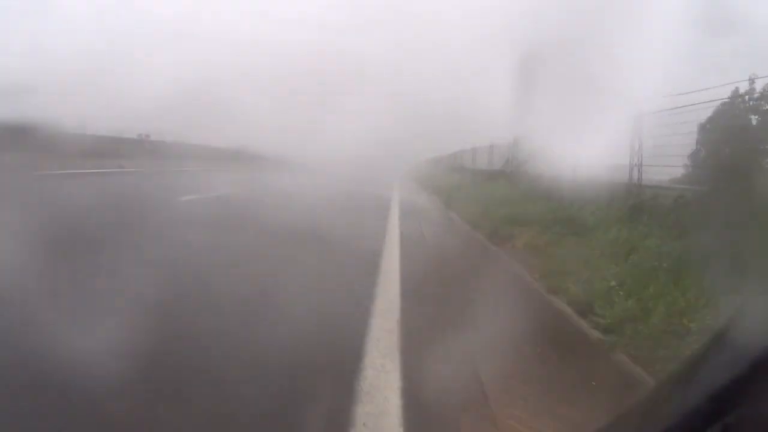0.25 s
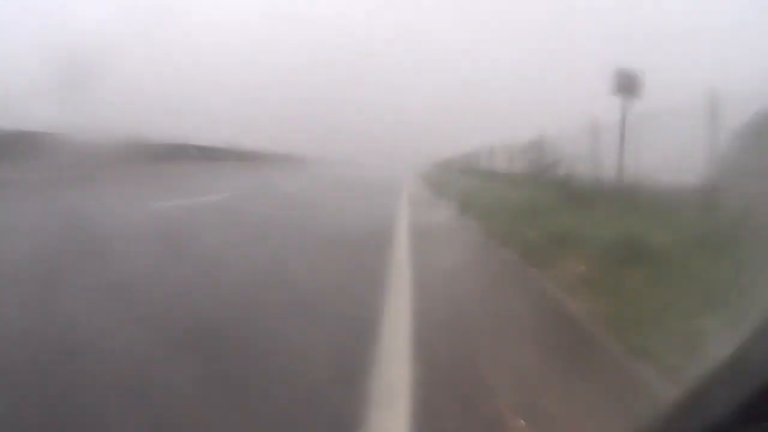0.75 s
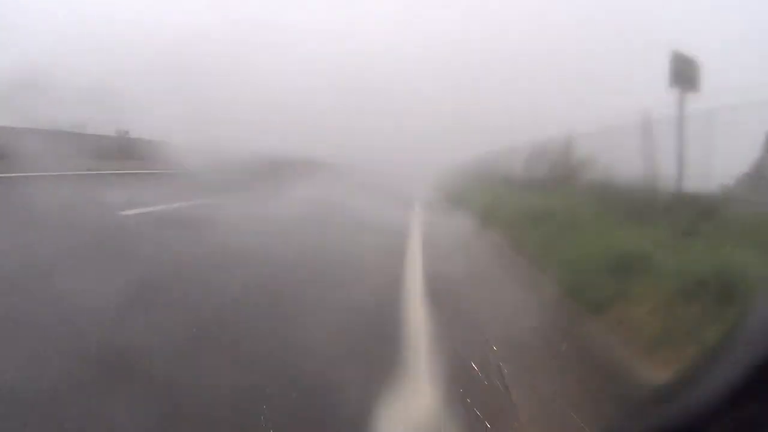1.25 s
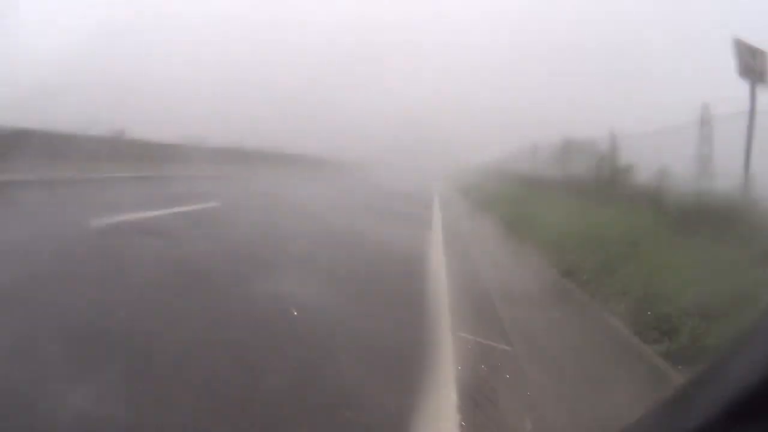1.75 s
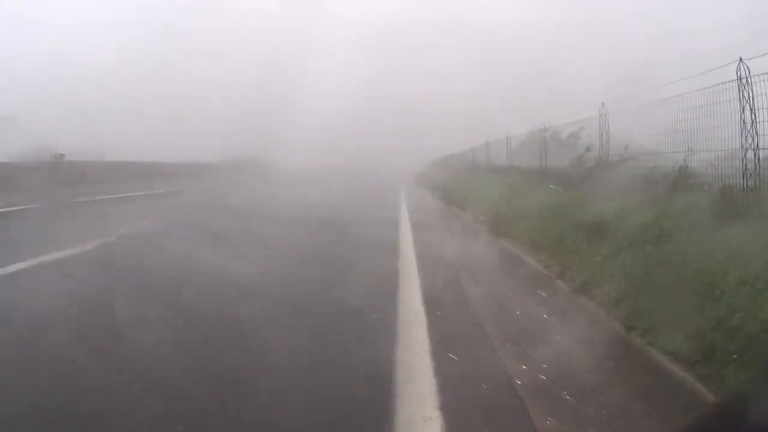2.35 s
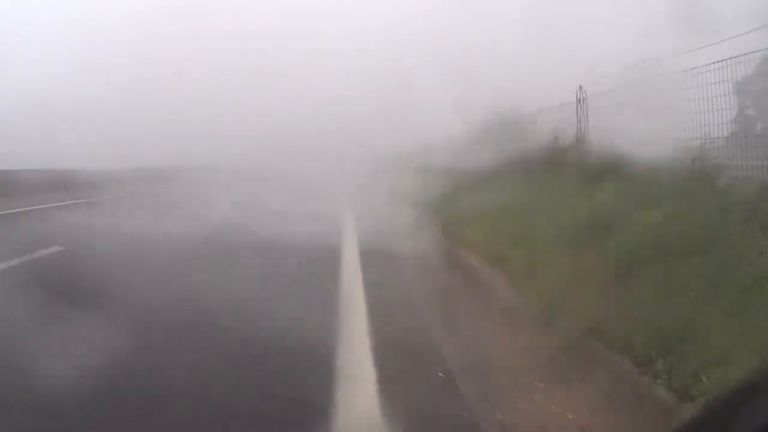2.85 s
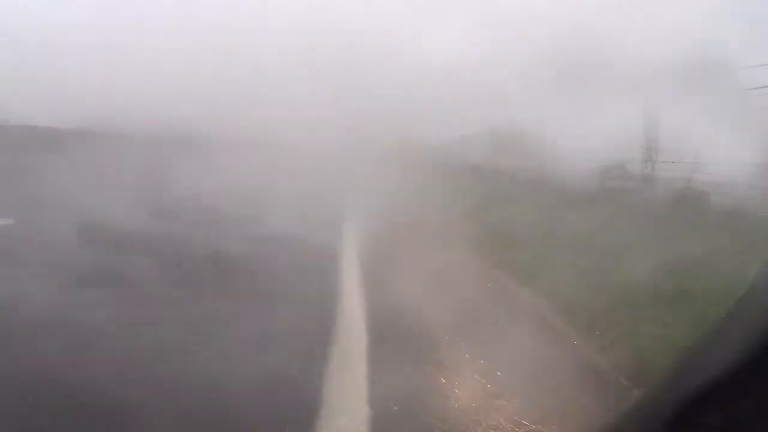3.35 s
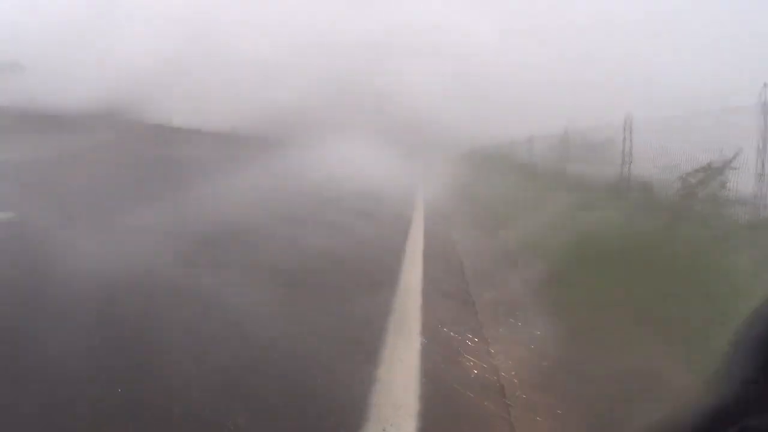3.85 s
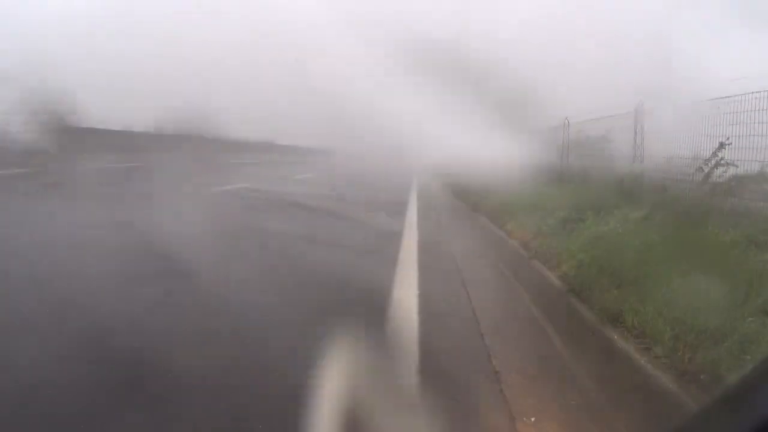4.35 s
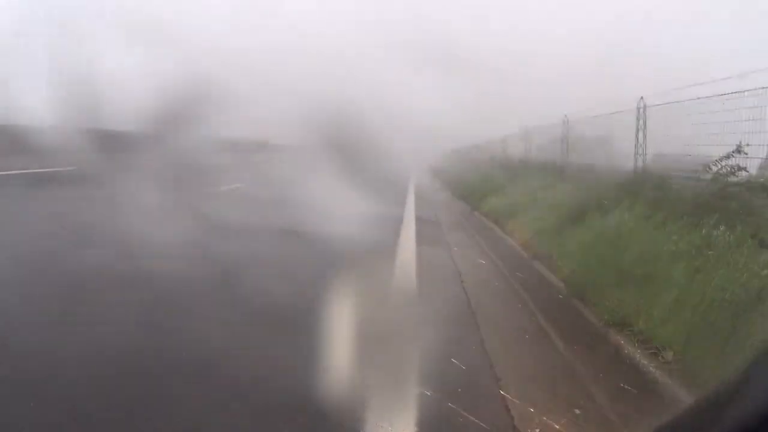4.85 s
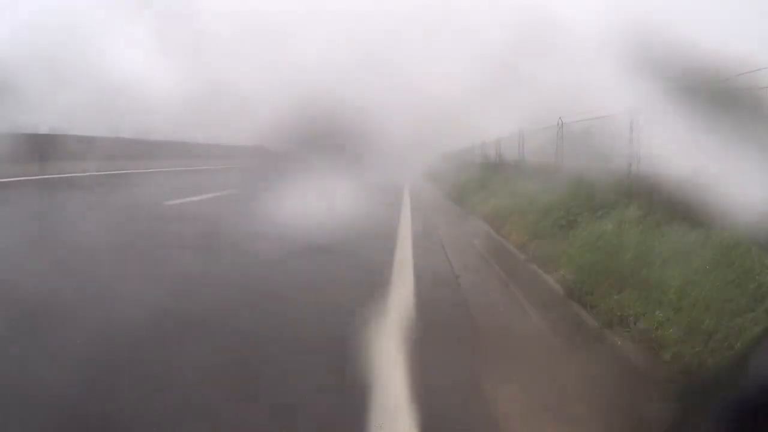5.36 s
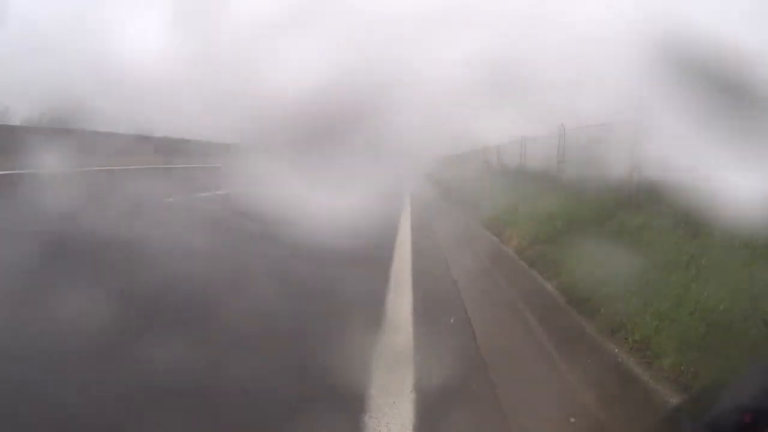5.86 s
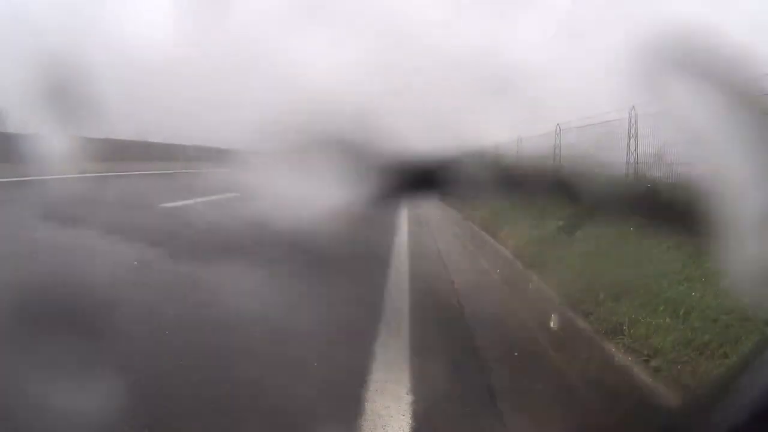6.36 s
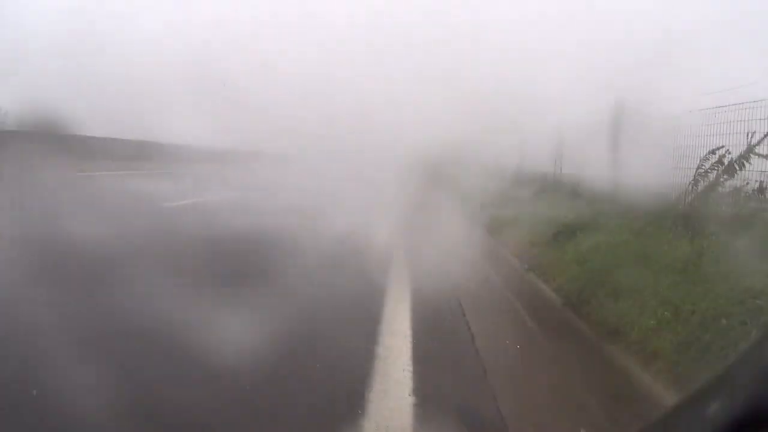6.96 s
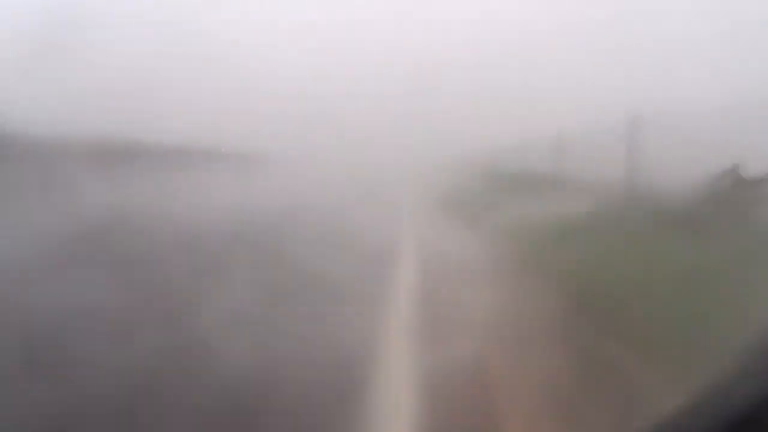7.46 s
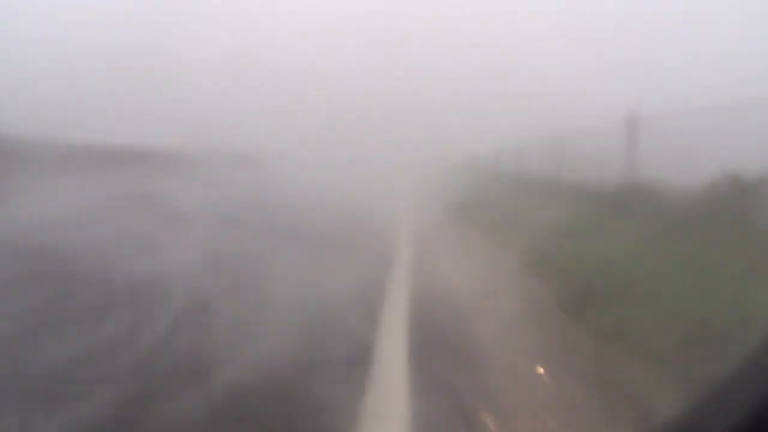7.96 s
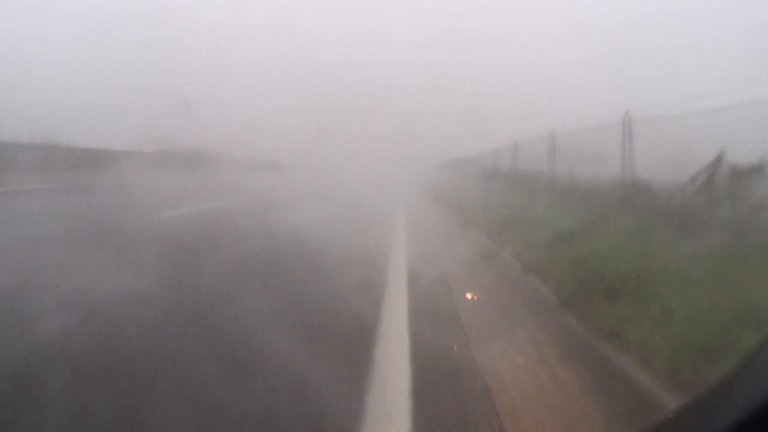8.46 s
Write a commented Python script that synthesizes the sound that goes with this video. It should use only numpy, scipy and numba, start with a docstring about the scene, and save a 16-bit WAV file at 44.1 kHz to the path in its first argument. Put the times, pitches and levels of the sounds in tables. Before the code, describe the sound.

Dense raindrops tick and sizzle against the microphone housing as a motorcycle rides fast, wind buffeting over its steady engine drone.

```python
"""On a motorcycle at highway speed in heavy rain, heard from a camera in a plastic case.
Drops strike the case and ring its modes, singly or in dense sheets of spray; water slugs plop on the
two microphone ports. Wind buffets the case; the engine booms through the mount; a low drone rises twice.
The camera's limiter flattens the hardest drops and briefly ducks everything else after each."""
import sys
import numpy as np
from scipy import signal
from scipy.fft import rfft, irfft, next_fast_len
from scipy.io import wavfile
from scipy.ndimage import uniform_filter1d, minimum_filter1d
from numba import njit

SR = 44100
rng = np.random.default_rng(int(sys.argv[2]) if len(sys.argv) > 2 else 0)


def store_wav(level_fs):
    """Save 16-bit WAV to argv[1]."""
    pcm = np.round(np.clip(np.atleast_2d(level_fs), -1, 1) * 32767)
    wavfile.write(sys.argv[1], SR, pcm.T.astype(np.int16))


N = 383669
RING_SAMPLES, ATTACK_SAMPLES = 1024, 160

# low drone: (time [s], pitch [Hz], level [dB])
DRONE_TRACK = [(1.8, 76, -78), (1.93, 80, -55), (2.06, 89, -46), (2.2, 86, -49), (2.35, 78, -68),
               (3.15, 60, -78), (3.4, 62, -64), (3.75, 67, -62), (4.2, 64, -62), (4.45, 63, -80)]
# engine speed: (time [s], firing rate [Hz])
FIRING_RATE = [(0, 49.71), (3.5, 51.03), (4, 52.9), (5.5, 53.66), (6.2, 52.48), (6.7, 54.1), (8.7, 50.43)]
# wind inside the case: (frequency [Hz], relative density [dB])
WIND_SPECTRUM = [(20, -24), (60, -18), (100, -13.5), (160, -0.5), (200, -0.5), (255, 3.5), (315, -3),
                 (370, -15.5), (650, -18.5), (800, -8), (1300, -20), (3300, -32), (5500, -37.5),
                 (11000, -58)]
# airflow under the gusts: (time [s], level [dB])
AIRFLOW_FLOOR = [(0, -39), (.75, -46), (1.602, -41), (2.25, -41), (2.45, -46.5), (3.3, -43.5), (4.4, -42),
                 (4.92, -49), (5.3, -41), (7.3, -38.5), (8.101, -46.5), (8.7, -39)]
# gusts on the case: (start [s], length [s], level [dB])
WIND_GUSTS = [(.03, 0.077, -37), (.2, 0.056, -36.5), (.34, 0.25, -36.5), (.94, 0.13, -39),
              (1.15, 0.092, -35), (1.35, 0.13, -39), (3.33, .28, -35.5), (3.68, .06, -41),
              (3.91, .31, -36.5), (4.53, .11, -37.5), (5.35, .17, -34.5), (5.63, 0.51, -36),
              (6.34, 0.19, -35), (6.5, 0.36, -32.5), (7.05, 0.068, -30), (7.87, 0.13, -36.5),
              (8.49, 0.14, -35)]
# case modes: (frequency [Hz], width [Hz], relative level [dB], left minus right [dB], left lead [rad])
CASE_MODES = [(782, 60, -18.5, -11, -0.2), (1002, 620, -18, 11, -0.75), (1276, 230, 1, 1, 0),
              (1355, 607, .5, -3.5, 0.17), (1819, 507, 4, 0, 0.23), (2660, 1330, -7, -2, 0.2),
              (2914, 855, -1.5, 2.5, 0.06), (3313, 1410, -9, 10.5, -0.7), (3490, 900, -3.5, 2, 2),
              (3950, 1420, -9.5, -1, 2.5), (4990, 1400, -17.5, -4.5, 0.5), (6670, 1830, -24.5, -3, -1),
              (7750, 2000, -22.5, 1, -1.3), (10400, 300, -34.5, -2, -1)]
# water slugs on a port: (time [s], pitch [Hz], relative level [dB], width [Hz], right lead [rad])
WATER_SLUGS = [(.219, 872, -15.5, 250, 0.3), (1.441, 916, -7.5, 259.6, 1.2), (2.246, 1333, -14, 111.1, 0),
               (2.436, 650, -11, 704, 3), (3.812, 600, -21, 594.5, 2.5), (4.430, 484, -12, 601.5, 0.8),
               (4.997, 482, -9, 601, -1.6), (5.001, 624, -11, 800, 7), (5.083, 660, -6, 700, 2.2),
               (5.875, 880, -21.5, 300, 4), (6.363, 880, -2, 650, 1.6), (6.367, 1230, -0.5, 330, 0),
               (6.373, 1170, -9, 169.4, -1)]
# thin spray between sheets: (time [s], relative level [dB])
SPRAY_FLOOR = [(0, -31), (1.55, -30), (2.38, -34), (2.75, -29), (3.35, -30), (4.3, -29), (5.8, -33),
               (6.05, -31), (6.33, -39), (6.5, -30), (8.7, -30)]
# sheets of spray: (start [s], length [s], relative level [dB])
SPRAY_SHEETS = [(0, .03, -19), (0.076, .04, -26), (.26, .075, -23), (0.599, .25, -17), (.85, .08, -22),
                (1.004, .045, -20.5), (1.256, .04, -22), (1.376, .12, -20.5), (1.602, .19, -20),
                (1.84, .09, -20.5), (1.989, .16, -21.5), (2.211, .12, -28), (2.45, .24, -20),
                (2.76, .37, -22.5), (3.141, .14, -21), (3.37, 0.094, -28), (3.52, .26, -21),
                (3.828, .15, -21), (4.041, .17, -21.5), (4.36, .07, -19.5), (4.53, .09, -21),
                (4.691, .31, -21), (5, .04, -27), (5.168, 0.12, -25), (5.402, .11, -28), (5.58, .14, -27),
                (6.07, .1, -18.5), (6.17, .08, -25), (6.66, .05, -23.5), (6.86, .16, -20),
                (7.129, .17, -20.5), (7.3, 1.133, -18.5), (8.479, .22, -20.5)]
# spray fineness: (time [s], relative treble [dB])
SPRAY_FINENESS = [(0, -18), (.35, -9), (.6, -11), (1.05, -10), (1.4, -12.5), (2.2, -6.5), (2.75, -8.5),
                  (3.45, -6), (4.05, -10), (4.4, -6.5), (4.9, -5.5), (5.8, -13.5), (6.2, -14.5),
                  (6.35, -22), (6.8, -15), (7.25, -4.5), (7.65, -13), (8.3, -12), (8.7, 0)]
# heavy single drops: (time [s], relative level [dB], nominal ring centre [Hz])
HEAVY_DROPS = [(0.043, -15, 1870), (0.149, -15, 2220), (0.196, -15, 1690), (0.332, -14, 1770),
               (0.357, -17, 2330), (0.429, -14, 2570), (0.436, -14, 1750), (0.462, -16, 2450),
               (0.487, -18, 1940), (0.511, -15, 1740), (0.519, -16, 1610), (0.573, -15, 2920),
               (0.602, -13, 2160), (0.964, -15, 1870), (0.982, -15, 2370), (1.047, -16, 2880),
               (1.066, -15, 2240), (1.088, -15, 1610), (1.134, -17, 1780), (1.23, -14, 2040),
               (1.254, -15, 2580), (1.277, -14, 1930), (1.31, -16, 1920), (1.336, -15, 2400),
               (1.578, -15, 2470), (1.83, -16, 2040), (1.963, -16, 2540), (2.178, -15, 2600),
               (2.223, -16, 2670), (2.25, -15, 1350), (2.265, -15, 2610), (2.29, -18, 2650),
               (2.331, -14, 2370), (2.354, -16, 2410), (2.38, -13, 2230), (2.389, -16, 2430),
               (2.402, -14, 2050), (2.436, -12, 2220), (2.748, -15, 2570), (2.904, -14, 2370),
               (3.813, -16, 2480), (4.006, -15, 1790), (4.254, -15, 2850), (4.299, -16, 2550),
               (4.511, -17, 1890), (4.638, -15, 2840), (5.001, -12, 2080), (5.017, -15, 2860),
               (5.083, -13, 2450), (5.16, -17, 2440), (5.198, -15, 2770), (5.281, -16, 2850),
               (5.391, -17, 2000), (5.523, -14, 2690), (5.551, -21, 1800), (5.577, -16, 2330),
               (5.622, -16, 1980), (5.734, -16, 1660), (5.744, -15, 1780), (5.876, -18, 1430),
               (5.98, -16, 1850), (6.026, -16, 1800), (6.276, -17, 2050), (6.308, -15, 2050),
               (6.368, -11, 1330), (6.383, -14, 1920), (6.429, -15, 2100), (6.477, -17, 2130),
               (6.501, -19, 1750), (6.678, -13, 1770), (6.755, -17, 2880), (6.815, -14, 1720),
               (6.837, -16, 2470), (6.989, -11, 1570)]


def undb(db):
    """Decibels to gain."""
    return 10 ** (np.asarray(db) / 20)


def unit(x):
    """Scale to rms 1."""
    return x / np.sqrt(np.mean(x ** 2))


def left_right(difference):
    """Split a difference evenly over the two ports."""
    return np.array([[.5], [-.5]]) * difference


def curves(table):
    """Table columns, linearly interpolated over time."""
    times_s, *columns = np.transpose(table)
    return [np.interp(np.arange(N) / SR, times_s, column) for column in columns]


def walk(rate_hz):
    """Random steps, smoothed twice; spread near 1."""
    hold = int(SR / rate_hz)
    steps = np.repeat(rng.standard_normal(N // hold + 1), hold)
    return 1.3 * uniform_filter1d(uniform_filter1d(steps, hold), hold)[:N]


def noise(spectrum):
    """Noise of rms 1, shaped by (frequency [Hz], level [dB]) points."""
    hz, db = np.transpose(spectrum)
    size = next_fast_len(N)
    bins_hz = np.arange(size // 2 + 1) * SR / size
    gain = undb(np.interp(np.log(bins_hz + 1), np.log(hz), db))
    return unit(irfft(rfft(rng.standard_normal(size)) * gain, size)[:N])


def swells_db(bursts, floor, attack_s, release_s):
    """Level of bursts that rise, hold and decay over a floor curve."""
    t = np.arange(N) / SR
    gain = undb(curves(floor)[0])
    for start_s, length_s, db in bursts:
        onset = np.clip((t - start_s) / attack_s + .5, 0, 1)
        fade = np.exp(-np.clip((t - start_s - length_s) / release_s, 0, 20))
        gain = np.maximum(gain, undb(db) * onset * fade)
    return 20 * np.log10(gain)


@njit
def peak_envelope(peaks, decay):
    """Instant attack, exponential release."""
    out, held = np.empty(len(peaks)), 0.
    for i in range(len(peaks)):
        held = max(peaks[i], held * decay)
        out[i] = held
    return out


def drone(octave_db=-9, waver_db=2.5, waver_hz=27.5):
    """A low, wavering tone rises out of the rumble and sinks back."""
    hz, db = curves(DRONE_TRACK)
    phase = 2 * np.pi * np.cumsum(hz) / SR
    tone = np.sin(phase) + undb(octave_db) * np.sin(2 * phase)
    return tone * undb(db + waver_db * walk(waver_hz))


def engine(gust_db, gain_db=-7, body_hz=240, width_hz=170, scatter_db=3, wobble=.012):
    """Uneven firings boom through the mount into the case; level tracks the wind."""
    firing_hz = curves(FIRING_RATE)[0] * (1 + wobble * walk(25))
    cycles = np.cumsum(firing_hz) / SR
    firings = np.diff(np.floor(cycles), prepend=0) * undb(scatter_db * rng.standard_normal(N))
    b, a = signal.iirpeak(body_hz, body_hz / width_hz, fs=SR)
    boom = signal.lfilter(b, a, signal.lfilter(b, a, firings))
    return unit(boom) * undb(gust_db + gain_db)


def wind(gust_db, flutter_db=2.5, flutter_hz=70, side_db=-15):
    """Turbulence shakes the whole case: nearly the same rush at both ports."""
    mid = noise(WIND_SPECTRUM)
    side = undb(side_db) * noise(WIND_SPECTRUM)
    return np.array([mid + side, mid - side]) * undb(gust_db + flutter_db * walk(flutter_hz))


def ring_at_ports(hz, width_hz, left_lead_rad):
    """A resonance swells and dies, phase-shifted between ports: ports x samples."""
    t = np.arange(RING_SAMPLES) / SR
    age = np.pi * width_hz * t
    return age * np.exp(1 - age) * np.sin(2 * np.pi * hz * t + left_right(left_lead_rad))


def slugs(gain_db=-4, right_bias_db=3):
    """Each water slug traps an air pocket: a hollow plop."""
    out = np.zeros((2, N))
    for time_s, hz, db, width_hz, right_lead_rad in WATER_SLUGS:
        start = int(time_s * SR)
        plop = ring_at_ports(hz, width_hz, -right_lead_rad)
        out[:, start:start + RING_SAMPLES] += undb(db + gain_db) * plop
    return out * undb(left_right(-right_bias_db))


def case_rings():
    """Impulse responses of the case: modes x ports x samples."""
    return np.array([width_hz / SR * undb(db + left_right(pan_db)) * ring_at_ports(hz, width_hz, lead_rad)
                     for hz, width_hz, db, pan_db, lead_rad in CASE_MODES])


def strike(tilt_db_per_oct, treble_db_per_oct, place_db, port_scatter):
    """Drive of each impact on the case: drops x modes x ports."""
    hz = np.array(CASE_MODES)[:, 0]
    octaves = np.clip(np.log2(hz / 2000), -1.3, .8)
    top_octaves = np.clip(np.log2(hz / 2400), 0, 1.5)
    chance = rng.standard_normal((len(tilt_db_per_oct), len(hz), 4))
    # impact point sets each mode's sign and strength
    place = np.sign(chance[..., :1]) * undb(place_db * chance[..., 1:2])
    # shorter waves differ more between ports
    ports = port_scatter * 2 ** octaves[:, None] * chance[..., 2:]
    # each drop rings brighter or duller; finer spray adds treble
    colour_db = np.outer(tilt_db_per_oct, octaves) + np.outer(treble_db_per_oct, top_octaves)
    return (place + ports) * undb(colour_db)[..., None]


def spray(rings, spray_db, treble_db, base_per_s=1600, mist_per_s=1300, clump_db=2, gain_db=1.5):
    """Countless drops ring the case; harder spray falls denser."""
    excess_db = spray_db - np.median(spray_db)
    rate_per_s = mist_per_s + base_per_s * undb(.8 * excess_db + clump_db * walk(90))
    hits = np.flatnonzero(rng.random(N) < rate_per_s / SR)
    # mostly tiny drops; a few tick above the sizzle
    size_db = np.minimum(5.5 * rng.standard_exponential(N), 19)
    size = undb(size_db[hits])
    tilt_db_per_oct = 5 * rng.standard_normal(N)[hits]
    weights = strike(tilt_db_per_oct, .56 * treble_db[hits], place_db=7, port_scatter=.55)
    # drops of one moment share the arriving water
    mode_energy = np.sum(rings ** 2, axis=(1, 2))
    energy = np.zeros(N)
    energy[hits] = size ** 2 * (np.mean(weights ** 2, axis=2) @ mode_energy)
    size /= np.sqrt(uniform_filter1d(energy, size=1800)[hits])
    out = np.zeros((2, N))
    for mode, ring in enumerate(rings):
        blows = np.zeros((2, N))
        blows[:, hits] = weights[:, mode].T * size
        out += signal.oaconvolve(blows, ring, axes=1)[:, :N]
    return unit(out) * undb(spray_db + gain_db)


def stray_drops(spray_db, base_per_s=24, base_db=-20, spread_db=2.5, centre_hz=2400, spread_oct=.22):
    """Random coarse drops, denser and harder in a sheet; rows as HEAVY_DROPS."""
    excess_db = spray_db - np.median(spray_db)
    rate_per_s = base_per_s * undb(.45 * excess_db)
    hits = np.flatnonzero((rng.random(N) < rate_per_s / SR)[:-RING_SAMPLES])
    size, colour = rng.standard_normal((2, N))[:, hits]
    db = base_db + .52 * excess_db[hits] + spread_db * size
    return np.column_stack([hits / SR, db, centre_hz * 2 ** (spread_oct * colour)])


def big_drops(rings, drops, treble_db, gain_db=1, splash_db=-9, splash_delay_s=.0024):
    """Heavy drops ring the case; a smaller splash follows each."""
    times_s, levels_db, centres_hz = drops.T
    tilt_db_per_oct = 13 * np.log2(centres_hz / 2100)
    out = np.zeros((2, N + RING_SAMPLES))
    for mean_delay_s, blow_db in (0, gain_db), (splash_delay_s, gain_db + splash_db):
        delays_s = mean_delay_s * (.5 + rng.random(len(drops)))
        starts = ((times_s + delays_s) * SR).astype(int)
        weights = strike(tilt_db_per_oct, .35 * treble_db[starts] - 2.5, place_db=4, port_scatter=.26)
        for start, weight, db in zip(starts, weights, levels_db):
            ring = np.einsum("mp,mpt->pt", weight, rings)  # sum over modes
            ring /= ring[:, :ATTACK_SAMPLES].std()
            out[:, start:start + RING_SAMPLES] += undb(db + blow_db) * ring
    return out[:, :N]


def scene(surge_db=1.66, surge_hz=20):
    """Rain on the case over wind, engine and drone."""
    spray_db = swells_db(SPRAY_SHEETS, SPRAY_FLOOR, attack_s=.012, release_s=.02)
    spray_db += surge_db * walk(surge_hz)
    gust_db = swells_db(WIND_GUSTS, AIRFLOW_FLOOR, attack_s=.046, release_s=.022)
    treble_db, = curves(SPRAY_FINENESS)
    treble_db -= np.mean(treble_db)
    rings = case_rings()
    drops = np.vstack([HEAVY_DROPS, stray_drops(spray_db)])
    rain = spray(rings, spray_db, treble_db) + big_drops(rings, drops, treble_db) + slugs()
    # the stiff case passes little bass from drops
    rain = signal.sosfilt(signal.butter(1, 240, "high", fs=SR, output="sos"), rain)
    return rain + wind(gust_db) + engine(gust_db) + drone()


def record(dry, ceiling_db=-3, release_s=.025, window_samples=31, cutoff_hz=11200):
    """Fast look-ahead limiter, then a steep low-pass."""
    envelope = peak_envelope(np.abs(dry).max(axis=0), np.exp(-1 / (release_s * SR)))
    gain = np.minimum(1, undb(ceiling_db) / (envelope + 1e-9))
    gain = uniform_filter1d(minimum_filter1d(gain, window_samples), window_samples)
    return signal.sosfilt(signal.ellip(8, .2, 70, cutoff_hz, fs=SR, output="sos"), dry * gain)


dry = scene()
out = record(dry)
store_wav(out)
```